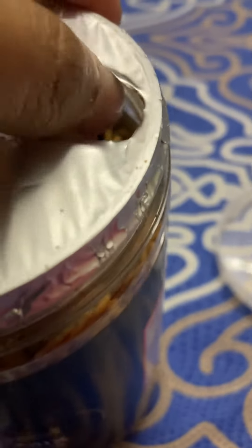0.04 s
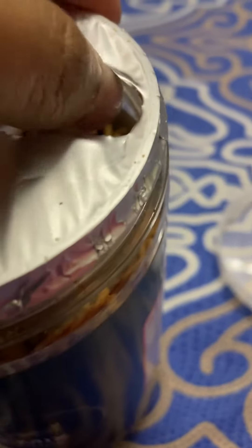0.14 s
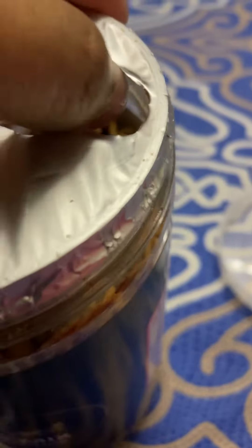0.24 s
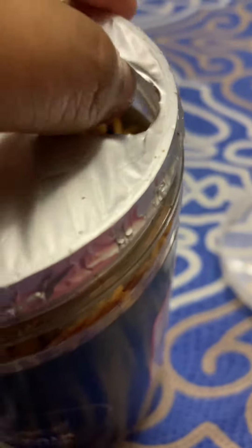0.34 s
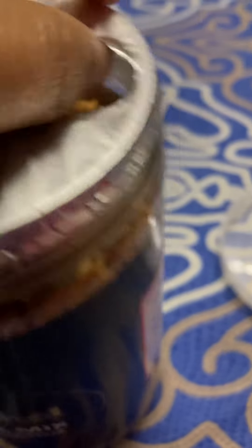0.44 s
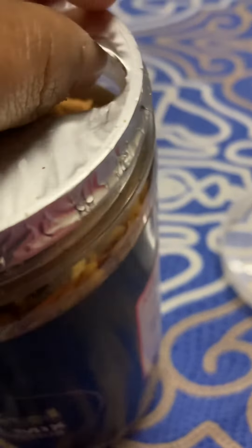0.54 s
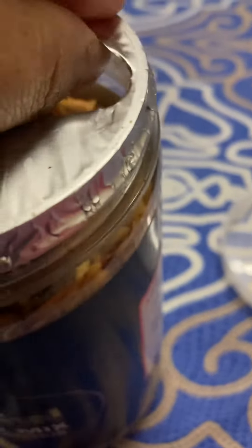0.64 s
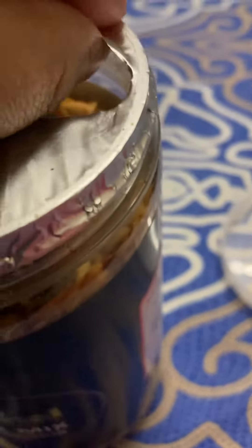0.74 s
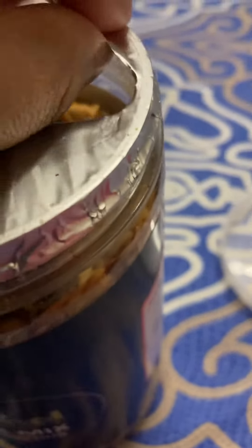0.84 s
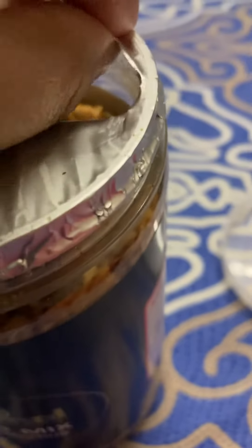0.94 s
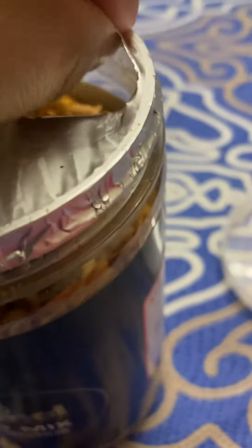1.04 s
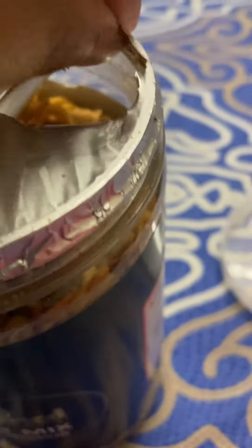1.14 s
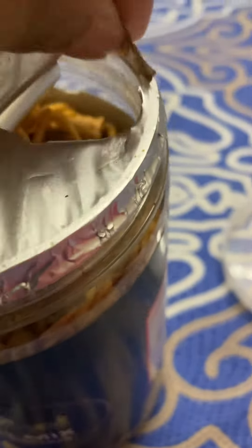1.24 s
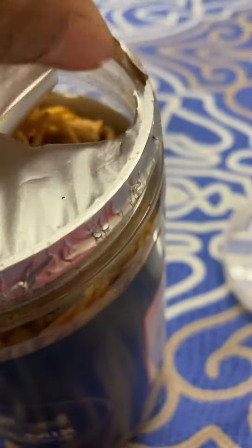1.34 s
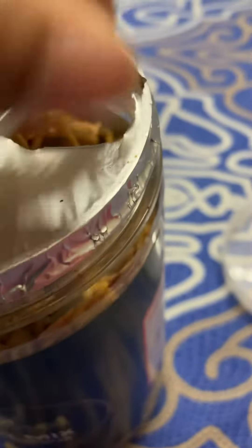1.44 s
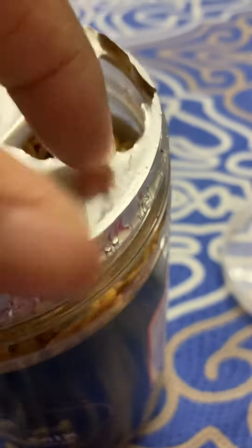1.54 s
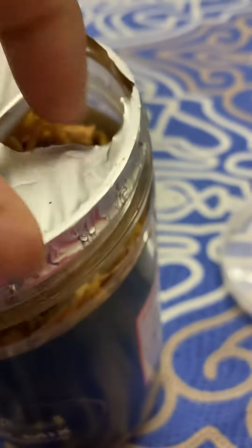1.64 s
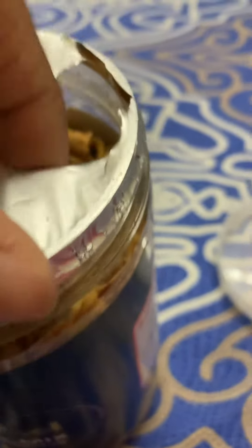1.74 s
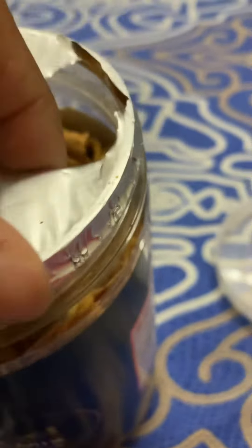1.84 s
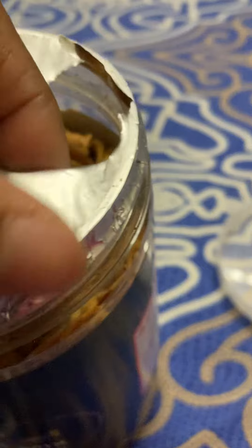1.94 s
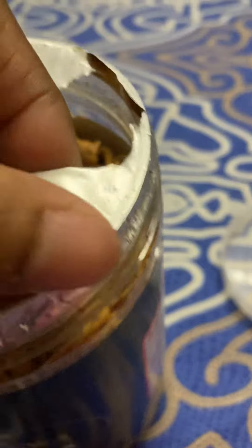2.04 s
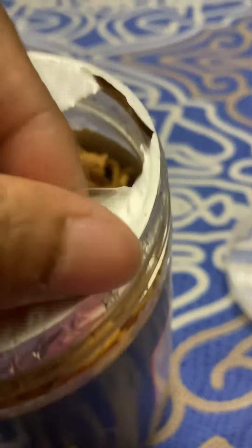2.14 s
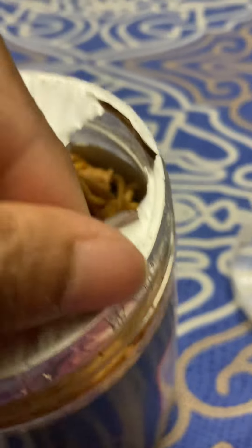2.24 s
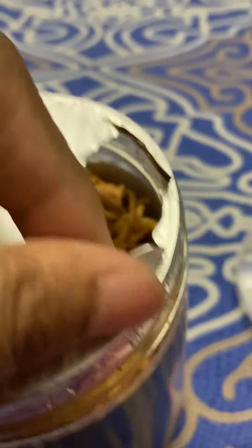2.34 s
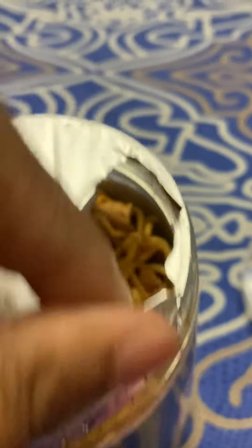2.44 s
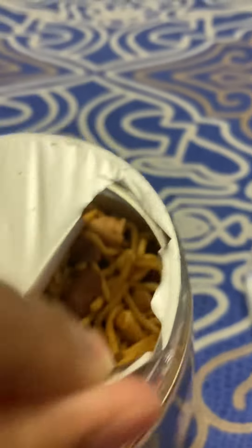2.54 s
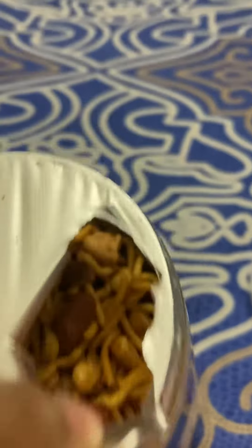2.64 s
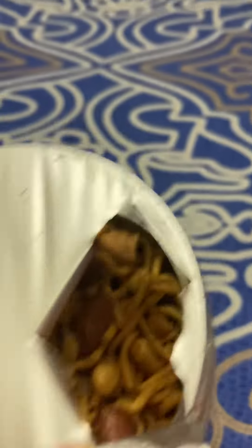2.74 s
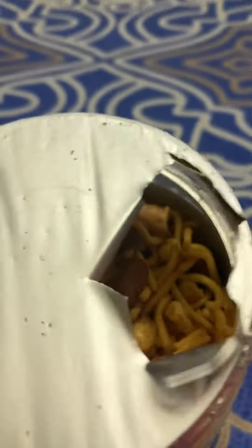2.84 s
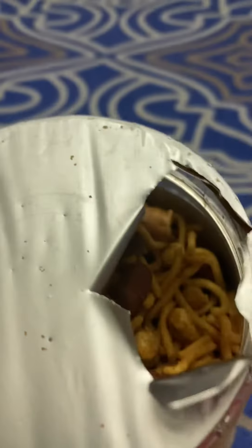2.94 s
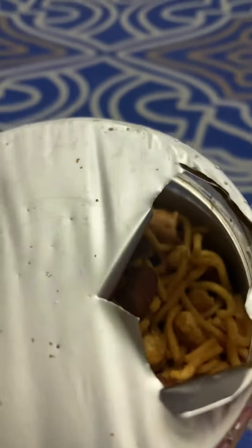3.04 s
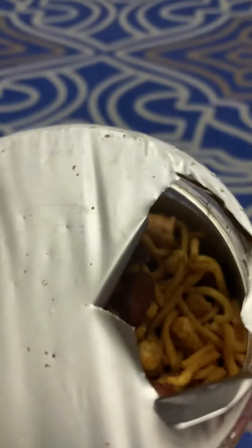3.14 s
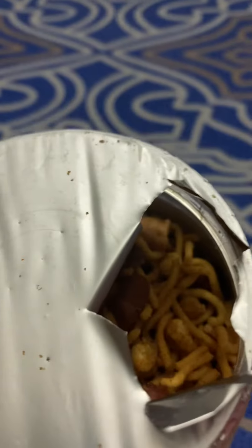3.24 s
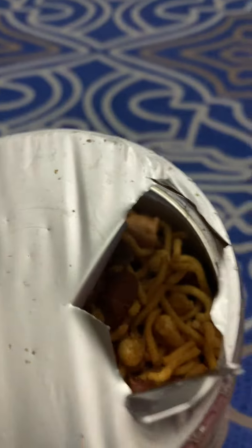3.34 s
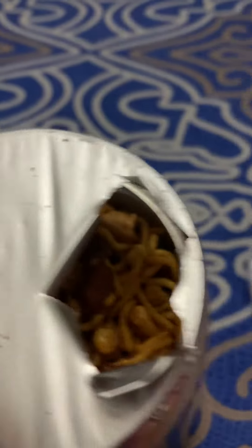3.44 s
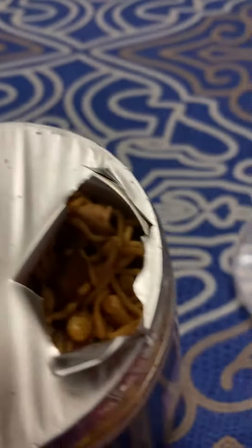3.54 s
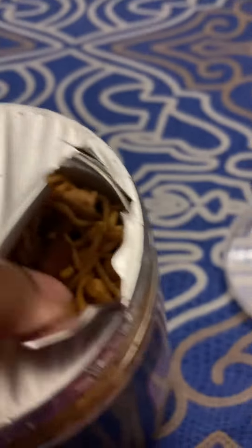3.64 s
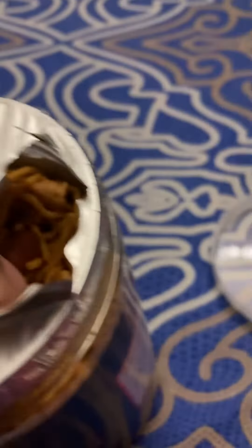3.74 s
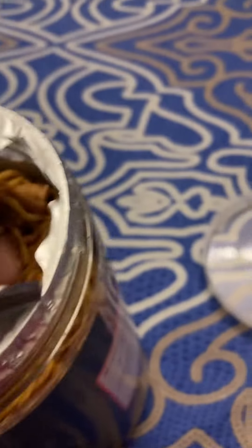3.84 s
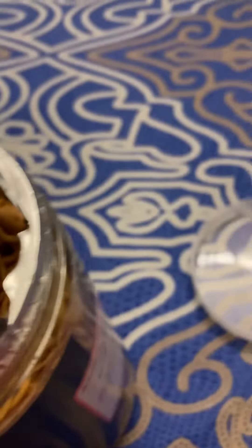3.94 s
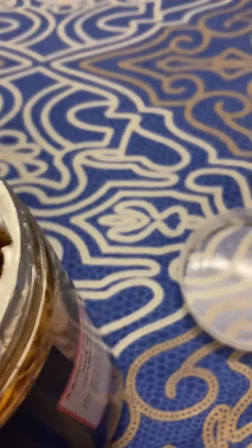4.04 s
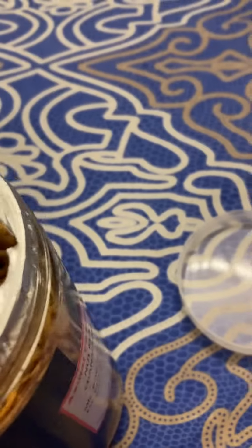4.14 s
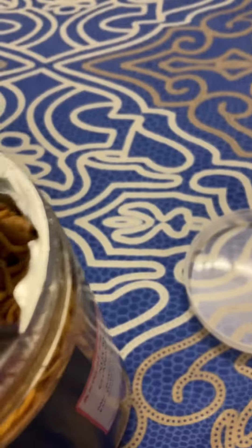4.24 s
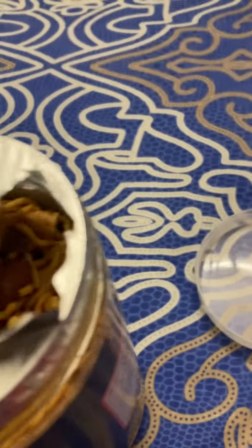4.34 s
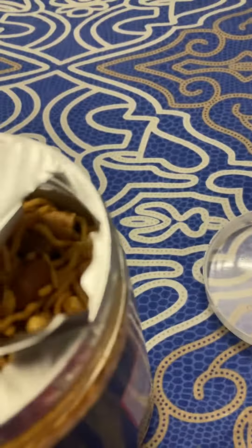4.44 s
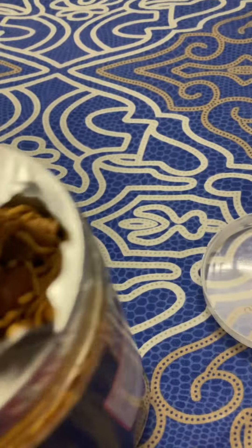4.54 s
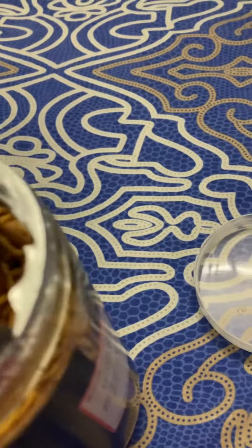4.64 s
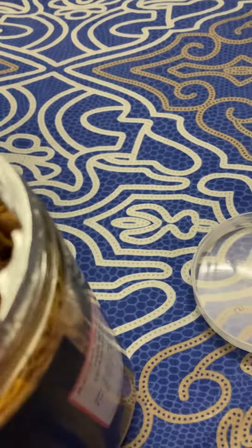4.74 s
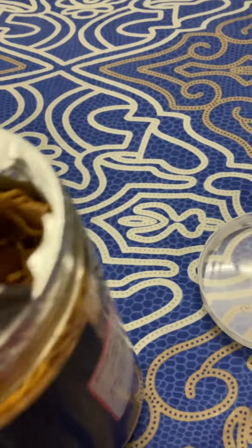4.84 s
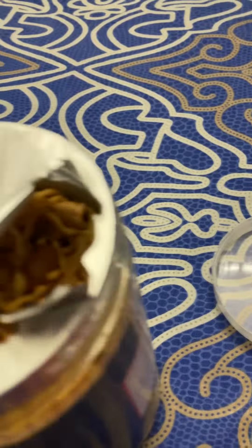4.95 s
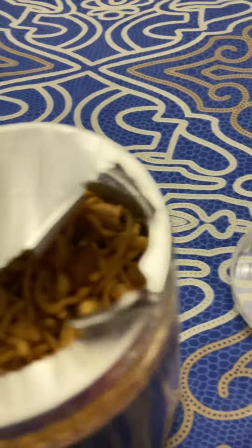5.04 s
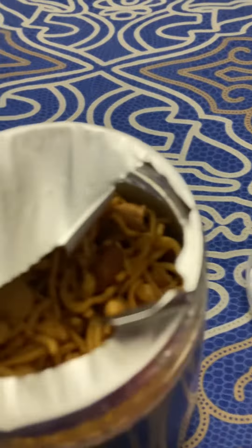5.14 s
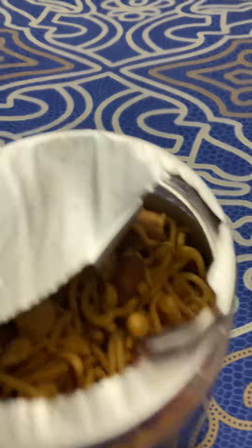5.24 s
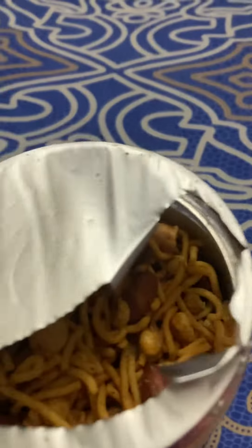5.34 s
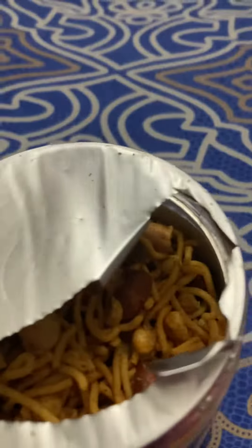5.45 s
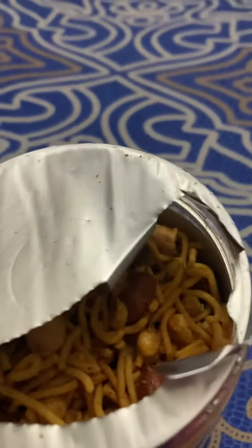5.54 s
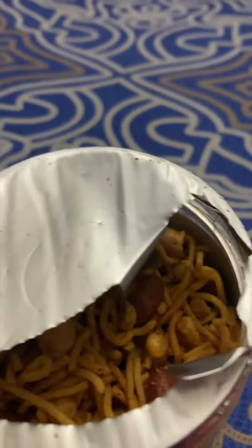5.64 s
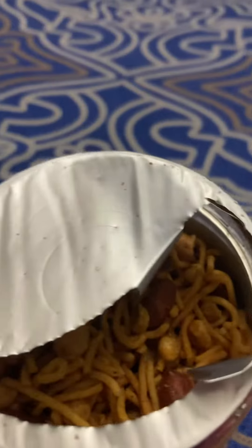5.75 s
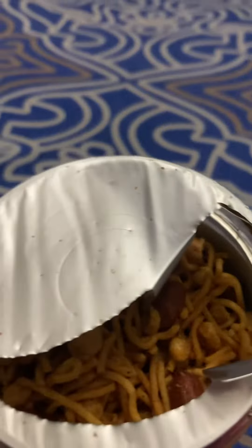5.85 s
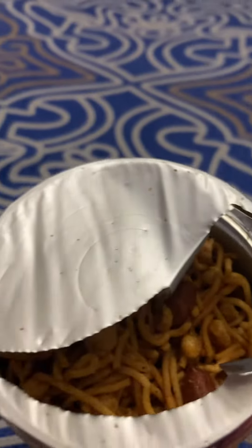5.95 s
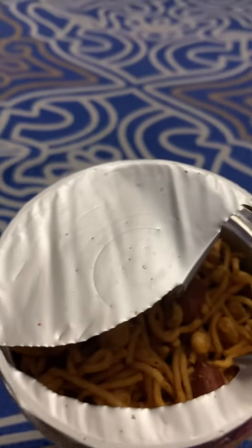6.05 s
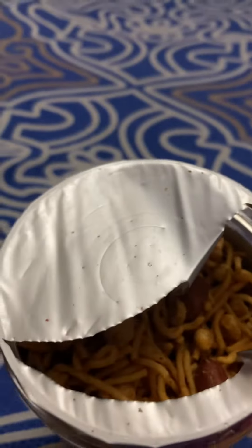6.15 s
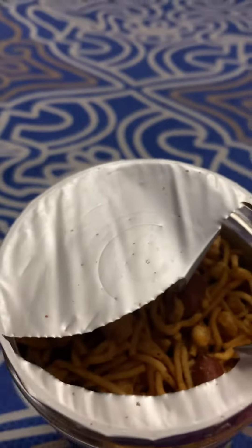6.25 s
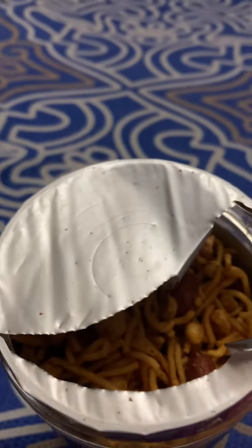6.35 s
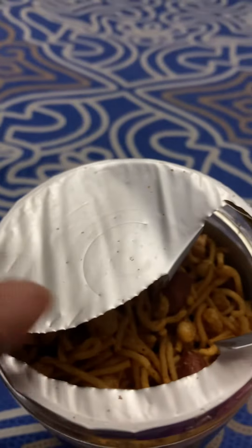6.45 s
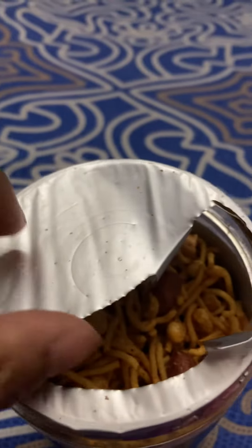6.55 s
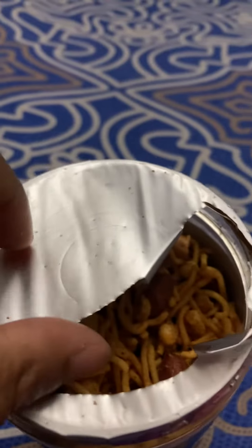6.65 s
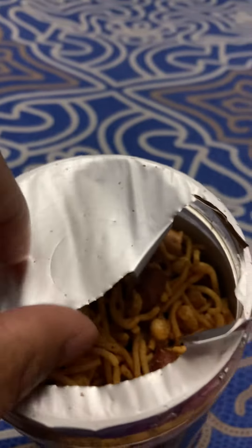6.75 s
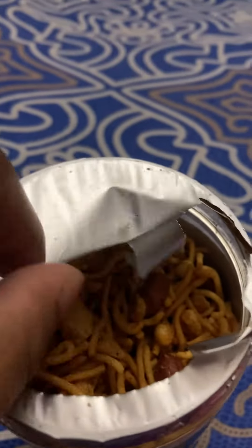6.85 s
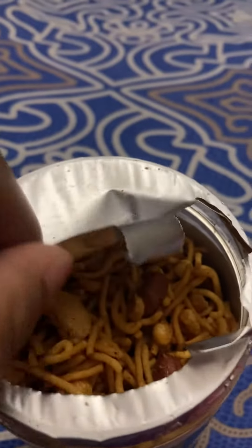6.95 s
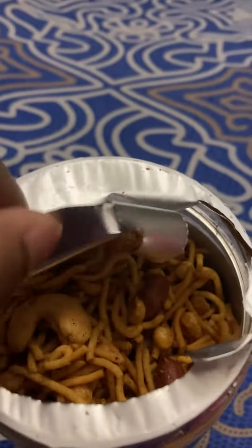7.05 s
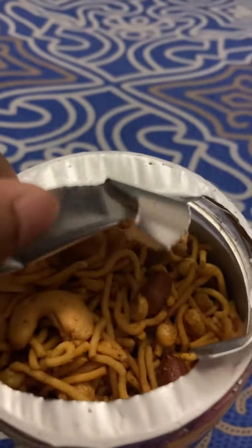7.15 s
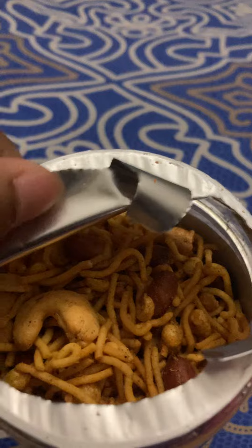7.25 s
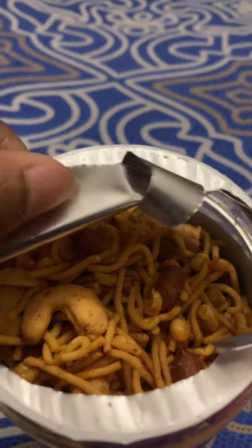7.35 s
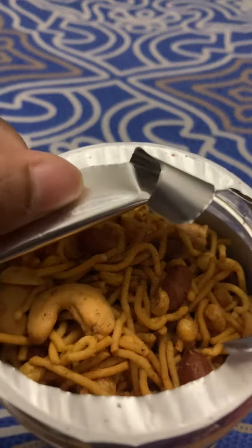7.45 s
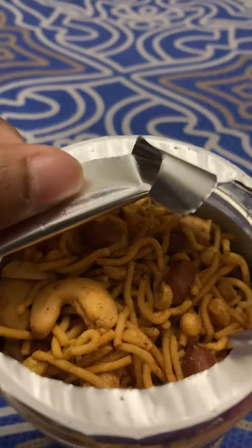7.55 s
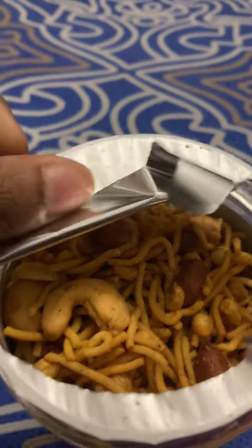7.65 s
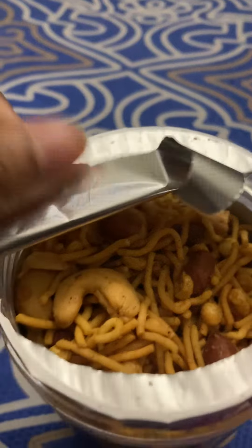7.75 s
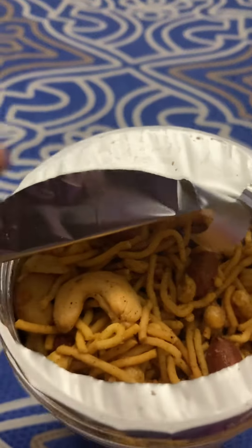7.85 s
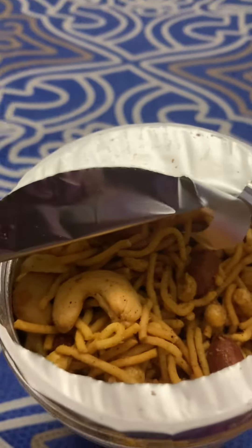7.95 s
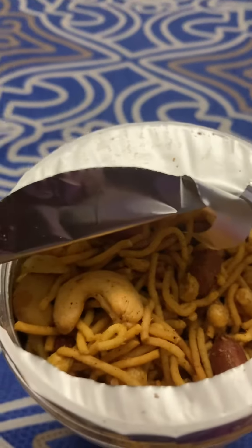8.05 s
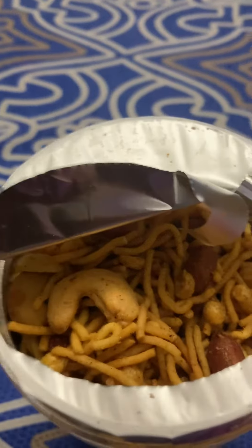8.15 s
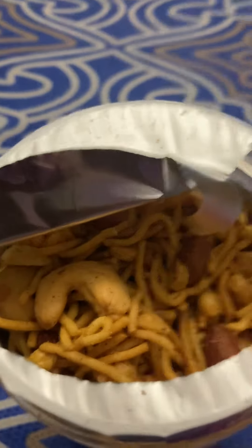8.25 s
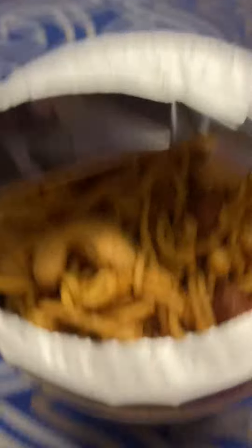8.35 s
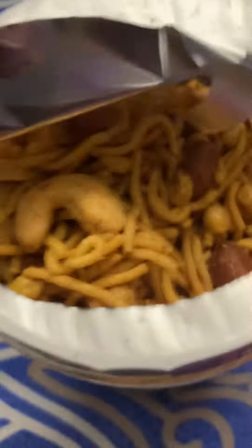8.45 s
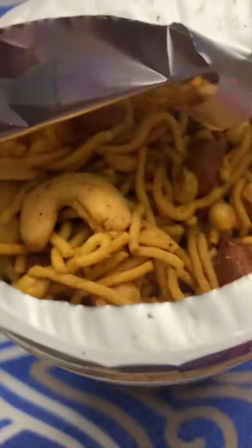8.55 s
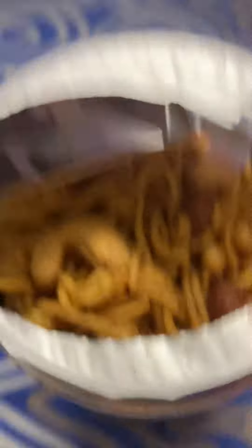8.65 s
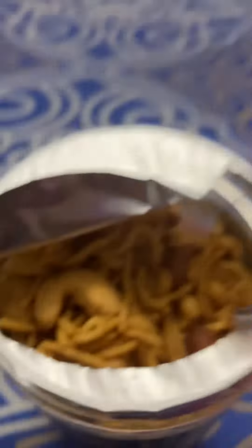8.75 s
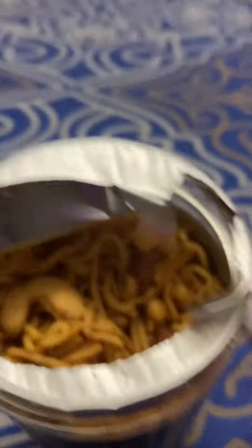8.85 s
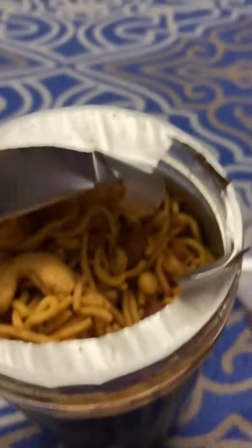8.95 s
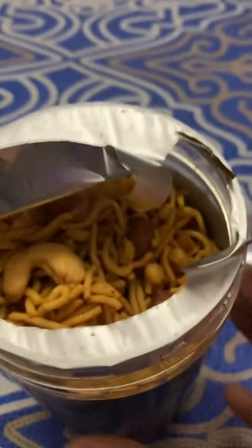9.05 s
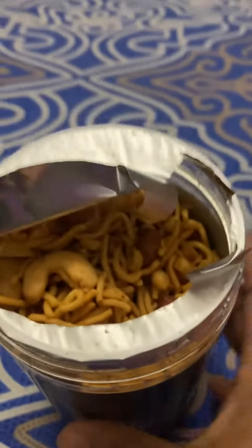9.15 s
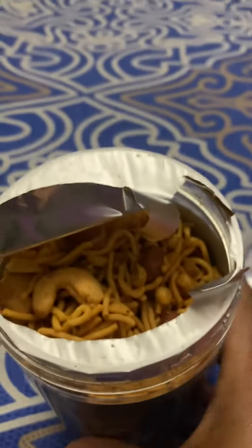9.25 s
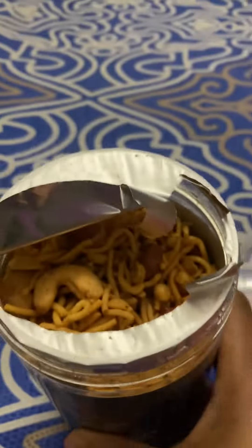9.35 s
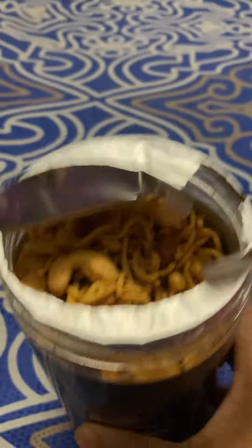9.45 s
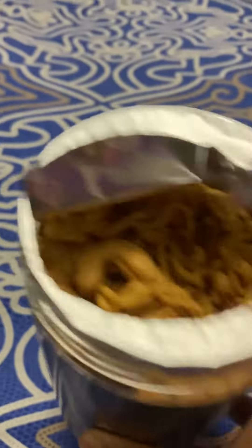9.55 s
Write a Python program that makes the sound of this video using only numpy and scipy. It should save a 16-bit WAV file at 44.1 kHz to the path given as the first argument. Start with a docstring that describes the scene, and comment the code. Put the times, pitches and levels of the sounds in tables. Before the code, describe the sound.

Stiff foil buckles and rips on a jar in irregular bursts: bright dry cracks, papery rustling and small hollow pops. A pause near three seconds leads to a harder rip, lighter creasing, then a tight cluster of snaps. After near quiet with faint scuffs of the grip, a final crack sounds. Close stereo pickup in a small, fairly dry room with a soft pulsing motor hum.

```python
"""Tearing a foil seal

A hand tears the foil seal off a plastic snack jar, close to a phone held indoors.
Each buckle of the foil is a noise burst that snaps and excites resonances of the rim and the jar's air.
Between snaps, random creasing rustles under each pull, with low thumps and soft swishes of the hand.
Two microphones hear it with sparse room reflections and scuffs of the grip on the phone.
A fan motor hums and throbs as two close tones beat, over the faint noise of the room's air."""
import sys
import numpy as np
from scipy import signal
from scipy.io import wavfile
from scipy.ndimage import uniform_filter1d

SR = 44100
rng = np.random.default_rng(int(sys.argv[2]) if len(sys.argv) > 2 else 0)


def generate_wav(signal):
    """Clip the signal to [-1, 1] and save it as 16-bit WAV at the path in sys.argv[1]."""
    frames = np.transpose(np.atleast_2d(signal))
    scaled = np.clip(frames, -1, 1) * 32767
    pcm = np.round(scaled).astype(np.int16)
    wavfile.write(sys.argv[1], SR, pcm)


N = 423801  # samples

# Snaps of the foil, levels relative: start_s, crack_db, jar_ring_db, crack_t60_s
SNAPS = [(0.1268, -30, -34.5, 0.073), (0.383, -19.5, -54, 0.03), (0.417, -41, -32, 0.02),
         (0.554, -70, -31, 0.02), (0.324, -42.5, -45.5, 0.47), (0.585, -64, -34, 0.035),
         (0.6138, -9.5, -29, 0.027), (0.627, -18, -23.5, 0.14), (0.652, -13, -39, 0.024),
         (0.9555, -18.5, -29.5, 0.007), (1.061, -28, -30, 0.026), (1.0957, -4.5, -19, 0.052),
         (1.1599, -26.5, -26.5, 0.12), (1.4507, -9, -16.5, 0.1), (1.5673, -5.5, -15.5, 0.08),
         (1.747, -22.5, -20, 0.027), (1.8833, -39.5, -25.5, 0.096), (1.93, -15, -22, 0.024),
         (2.053, -79, -21, 0.074), (2.092, -26.5, -22.5, 0.046), (2.1032, -6.5, -22.5, 0.052),
         (2.261, -33.5, -50, 0.087), (2.2875, -16.5, -29, 0.1), (2.3437, -11, -48, 0.0048),
         (2.408, -14.5, -25.5, 0.13), (2.6678, -20, -61, 0.0056), (2.7302, -9, -22, 0.068),
         (3.561, -38.5, -45, 0.19), (3.641, -35.5, -29.5, 0.04), (3.858, -12.5, -31.5, 0.031),
         (3.9478, -9.5, -19, 0.0023), (3.9813, -6, -17, 0.076), (4.0079, -13, -24, 0.11),
         (4.382, -11.5, -22.5, 0.074), (4.4382, -23.5, -30, 0.063), (4.691, -30.5, -34.5, 0.039),
         (4.774, -59, -34, 0.12), (4.839, -30.5, -35, 0.15), (4.9155, -15, -21, 0.053),
         (5.1646, -16, -33.5, 0.06), (5.2971, -25, -33, 0.085), (5.456, -33.5, -64, 0.03),
         (5.509, -30.5, -53, 0.035), (5.754, -23, -54, 0.15), (5.939, -32, -61, 0.13),
         (6.014, -34, -65, 0.025), (6.159, -6.5, -61, 0.0043), (6.2122, -14.5, -53.5, 0.0073),
         (6.4316, -27, -75, 0.031), (6.575, -30.5, -34, 0.21), (6.592, -26, -26, 0.12),
         (6.711, -35, -28, 0.095), (6.7238, -14, -25, 0.12), (6.7649, -8, -17.5, 0.049),
         (6.785, -3.5, -40.5, 0.017), (6.849, -13, -21, 0.027), (6.888, -29.5, -36, 0.0097),
         (6.9452, -12, -31, 0.046), (6.9831, -6.5, -38, 0.013), (7.116, -4.5, -30, 0.024),
         (7.404, -37.5, -42.5, 0.015), (7.546, -16, -23, 0.098), (7.5875, -8.5, -39, 0.012),
         (7.6889, -13.5, -29.5, 0.029), (7.7386, -22, -36, 0.07), (8.68, -52, -59.5, 0.015),
         (9.393, -3.5, -22, 0.042), (9.5662, -21, -44, 0.74)]
# Spectrum of the bare foil: frequency_hz, level_db
FOIL = [(3500, -42.5), (5500, 5), (9200, 6), (11500, -3), (14000, 1.5), (15800, -9)]
# Resonances of the taut foil on the rim: pitch_hz, width_hz, level_db
RIM = [(2008, 170, 0), (3055, 720, -2.5), (4180, 260, -14)]
# Resonances of the air at the opening: pitch_hz, width_hz, level_db
MOUTH = [(1004, 62, 11), (1164.5, 210, 15)]
# Seal's drum note, air inside, plastic wall, seal's overtone: pitch_hz, width_hz, level_db
HOLLOW = [(176, 29, 2.5), (262, 42, -3), (331, 49, 6), (700, 110, -15)]
TORN_S = 3.9  # the tear runs on and the seal stops drumming
# The rim lies between crack and jar ring; the hollow follows the jar ring
RIM_FROM_CRACK, SNAP_RIM_DB, SNAP_HOLLOW_DB = 0.41, 3.5, -12
# Per doubling of a snap's length: big folds thump more and ring the rim less
LONG_HOLLOW_DB, LONG_RIM_DB, USUAL_T60_S = 3, -0.5, 0.037
# Separate pulls of the fingers, levels nominal: start_s, rise_s, fade_s, fizz_db, jar_ring_db
PULLS = [(-0.05, 0.027, 1.0, -66.5, -55.5), (0.297, 0.18, 0.52, -49.5, -47.5),
         (0.847, 0.31, 0.15, -47, -39.5), (1.44, 0.26, 0.16, -49.5, -49.5), (1.88, 0.24, 0.18, -52.5, -66),
         (2.23, 0.47, 0.21, -52.5, -53), (2.95, 0.32, 0.38, -90, -67), (3.5, 0.16, 0.75, -56, -52.5),
         (3.85, 0.16, 0.029, -35, -64), (4.154, 0.15, 0.62, -35.5, -30), (4.602, 0.21, 0.67, -46, -42),
         (5.251, 0.13, 0.49, -53.5, -70), (5.661, 0.38, 0.5, -53, -65.5), (6.362, 0.076, 0.16, -73.5, -59),
         (6.53, 0.37, 0.63, -50, -50.5), (7.419, 0.28, 0.17, -60.5, -54), (9.04, 0.021, 0.52, -69.5, -88),
         (9.299, 0.1, 0.18, -55, -50.5), (9.501, 0.12, 0.16, -43, -46.5)]
SWELL_DB, ROUND = -31, 1.016  # level one rise or fade away from the peak; exponent rounding its top
IDLE_FIZZ_DB, IDLE_JAR_DB = -87, -84.5  # the hand merely holding the jar
HOLLOW_FOLLOWS, HOLLOW_DB = 0.96, -3.5  # the hollow rumble swells less than the mouth ring
BEND_DB = 5.5  # how far the colour of the rustle wanders as the flap bends
BEND_STEP = 0.05  # pitch ratio step between neighbouring bends of the flap
# Low thumps as the whole seal or the jar flexes in the hand: start_s, peak_db, pitch_hz, t60_s
THUMPS = [(0.114, -32.5, 325, .06), (1.452, -29.5, 183.2, .08), (2.103, -22.5, 264, 0.055),
          (9.391, -22, 905, 0.14)]
# Swishes and rubs as the hand moves over jar and phone: middle_s, length_s, mean_pitch_hz, level_db
SWISHES = [(3.594, .35, 180.3, -48.5), (7.931, 0.24, 2010, -72), (8.831, .3, 1282, -78),
           (9.2, 0.15, 1610, -76)]
# The hand shifts on the phone, pushing the two microphones opposite ways: start_s, peak_db, pitch_hz, t60_s
GRIP = [(8.185, -36, 622, 0.23), (8.515, -43.5, 645, 0.034), (8.674, -43.5, 836, 0.057)]
# Decay of the room: frequency_hz, t60_s
ROOM = [(250, 0.35), (1500, 0.18), (12000, 0.022)]
# Phase by which the left microphone leads: frequency_hz, lead_rad
LEAD = [(0, 4.5), (350, -0.97), (690, -2), (1030, -0.95), (1550, -2.5), (2070, -2), (3100, -3), (4130, -5),
        (6030, -2.5), (12060, 2.5), (16700, 8.5)]
# Typical drift of that lead as phone and jar move: frequency_hz, drift_rad
SWAY = [(150, 0.068), (1500, .7), (10000, 0.016)]
# Level of the left microphone minus the right: frequency_hz, difference_db
LEAN = [(400, -0.5), (1650, -2.5), (8000, 0)]
HUM_HZ, BEAT_UNIT_HZ = 100.79, 4.6
# Tones of the fan: offset above the hum (in units of BEAT_UNIT_HZ), level_db (rms)
THROB = [(0, -48.5), (1.004, -59.5)]
WEAKEST_S = 8.135  # a moment when the throb is at its lowest
# Spectrum shape of the room air common to both microphones: frequency_hz, density_db
AIR = [(25, -16), (60, 1.5), (115, 4), (190, -5), (300, -13), (500, -26.5), (2000, -35.5), (16000, -56)]
# Spectrum shape of the room air opposed between them: frequency_hz, density_db
AIR_SIDE = [(25, -8), (100, -6), (400, -21), (2500, -34.5), (16000, -56)]
AIR_DB, AIR_SIDE_DB = -60.5, -64.5  # rms
EDGE_HZ = 16800


def snaps():
    """Impulsive excitation: strain creaks, creases burst and die, and a slower push rings the cavity."""
    out = np.zeros(N)
    t = np.arange(8000) / SR - .02
    after = np.maximum(t, 0)
    foil = causal(FOIL)
    for s, crack_db, mouth_db, t60 in SNAPS:
        doublings = np.log2(t60 / USUAL_T60_S)
        rim_db = RIM_FROM_CRACK * crack_db + (1 - RIM_FROM_CRACK) * mouth_db
        rim_db += SNAP_RIM_DB + LONG_RIM_DB * doublings
        hollow_db = mouth_db + SNAP_HOLLOW_DB + LONG_HOLLOW_DB * doublings
        shape, facet = rng.uniform(-1, 1, 2)  # how the flap is bent this time

        # strain builds before the fold gives
        creak = amp(-20.0) * np.exp(np.minimum(t, 0) / (0.067 * t60)) * (t < .002)
        burst = crackle(count=len(t), per_s=3000, spread_db=2.0, smooth=0.84)
        crack_decay = amp(-60 * after / t60) * (1 - np.exp(-after / (0.0089 * t60)))
        crack = burst * (creak + crack_decay)
        crack += 3.1 * np.exp(-((t - .0004) / .00003) ** 2)  # the first crease is the sharpest

        # small facets are brighter and settle first
        quick = crack * (.4 + amp(-60 * after / 0.036))
        bright = signal.lfilter([1, .5 * facet, 0.52 * shape], [1], quick)
        push_decay = amp(-60 * after / (0.0079 + 0.9 * t60)) * (1 - np.exp(-after / 0.0021))
        push = burst[::-1] * (creak + push_decay)

        hollow = HOLLOW if s < TORN_S else HOLLOW[1:-1]
        parts = ((bright, foil, crack_db),
                 (crack, ringing(RIM, 1 + 0.1 * facet), rim_db),
                 (push, ringing(MOUTH, 1 + 0.092 * shape), mouth_db),
                 (push, ringing(hollow, 1 + 0.21 * facet), hollow_db))
        for drive, body, db in parts:
            sound = signal.fftconvolve(drive, body)[:len(t)]
            add(out, s + t[0], peaked(sound, db + 2.0))
    return out


def rustle():
    """Random excitation: uneven creasing drives foil, rim, mouth and hollow, each from its own patch."""
    t, out = np.arange(N) / SR, 0
    fizz_db, mouth_db = (np.repeat(level, 32)[:N] for level in pulls(t[::32]))
    hollow_db = HOLLOW_FOLLOWS * mouth_db + HOLLOW_DB
    rim_db = 0.39 * fizz_db + 0.6 * mouth_db  # the rim follows the mouth more than the fizz
    drum_db = np.where(t < TORN_S, hollow_db - 5.0, -120)

    # a hard pull rips evenly, a light touch in fits; the idle hand only brushes
    light = np.clip((-32 - mouth_db) / 28, .25, 1)
    light = light * np.clip((fizz_db - IDLE_FIZZ_DB) / 12, .2, 1)

    # small folds shake every part at once, the bare foil most; each starts sharply and dies in some ms
    kinks = amp(4.0 * np.minimum(rng.exponential(1, N), 3)) * (rng.random(N) < 60 / SR)
    shared = .7 + signal.lfilter([1], [1, -np.exp(-1 / (.007 * SR))], kinks) * light

    levels = fizz_db, rim_db, mouth_db, hollow_db, drum_db
    bodies = None, RIM, MOUTH, HOLLOW[1:-1], HOLLOW[:1]  # None is the bare foil
    for db, body in zip(levels, bodies):
        own = evened(uniform_filter1d(rng.standard_normal(N), 900))
        creases = crackle(count=N, per_s=580, spread_db=3.5, smooth=1)
        shake = np.sqrt(shared) if body else shared
        drive = creases * shake * amp(2.5 * light * own)
        sound = flexing(drive, body) if body else signal.oaconvolve(drive, causal(FOIL))[:N]
        out = out + amp(db) * evened(sound)
    return out


def pulls(t):
    """Addition of powers: every pull swells to its peak and fades, over the idle hand; in decibels."""
    power = np.ones_like(t) * amp([[2 * IDLE_FIZZ_DB], [2 * IDLE_JAR_DB]])  # doubled dB give power
    for start, rise, fade, fizz_db, jar_db in PULLS:
        peak_s = start + rise
        off = np.maximum((peak_s - t) / rise, (t - peak_s) / fade)
        swell = amp(2 * SWELL_DB * np.minimum(off, 10) ** ROUND)
        power = power + amp([[2 * fizz_db], [2 * jar_db]]) * swell
    return 10 * np.log10(power)


def flexing(drive, modes):
    """Variable resonance: crossfaded resonators slide the pitch up and down as the flap bends."""
    slow = uniform_filter1d(uniform_filter1d(rng.standard_normal(N), size=3000), size=3000)
    bend = np.clip(evened(slow), -2, 2)
    out = 0
    for k in range(-2, 3):
        share = np.sqrt(np.clip(1 - abs(bend - k), 0, 1))
        out = out + signal.oaconvolve(drive * share, ringing(modes, 1 + BEND_STEP * k))[:N]
    return out


def wandering(x):
    """Time-varying filtering: narrow peaks and dips drift, each lasting about a tenth of a second."""
    z = signal.stft(x, nperseg=512, noverlap=384)[2]
    patches = patchy(rng.standard_normal(z.shape[::-1]).T, bins=3, frames=30)
    gain = amp(BEND_DB * patches - BEND_DB ** 2 / 14.0)  # the offset makes up for the louder peaks
    return signal.istft(z * gain, nperseg=512, noverlap=384)[1][:N]


def thumps():
    """Damped resonance: each short dull push rings one low mode."""
    out, t = np.zeros(N), np.arange(9000) / SR
    for s, db, hz, t60 in THUMPS:
        push = rng.standard_normal(len(t)) + 30 * np.exp(-t / 0.00029)
        push = push * amp(-60 * t / t60) * (1 - np.exp(-t / .001))
        sound = signal.fftconvolve(push, ringing([(hz, 0.1 * hz, 0)]))[:len(t)]
        add(out, s, peaked(sound, db))
    return out


def swishes():
    """Narrow-band friction noise: slow noise shifted to a pitch that sags as the stroke swells and fades."""
    out = np.zeros(N)
    for s, length, hz, db in SWISHES:
        u = np.arange(0, 1, 1 / (length * SR))  # progress of the stroke
        noise = rng.standard_normal((SR, 2))[:len(u)] @ [1, 1j]
        slow = signal.lfilter([1], [1, -np.exp(-np.pi * 0.12 * hz / SR)], noise)
        turns = np.cumsum(hz * (1 + 0.22 * (.5 - u))) / SR
        hiss = (slow * np.exp(2j * np.pi * turns)).real
        add(out, s - length / 2, amp(db) * np.sin(np.pi * u) * evened(hiss))
    return out


def grip():
    """Structure-borne sound: decaying noise rings one broad mode, as dull scuffs through the phone's case."""
    out, t = np.zeros(N), np.arange(9000) / SR
    for s, db, hz, t60 in GRIP:
        scuff = rng.standard_normal(len(t)) * amp(-60 * t / t60) * (1 - np.exp(-t / 0.0027))
        sound = signal.fftconvolve(scuff, ringing([(hz, 0.21 * hz, 0)]))[:len(t)]
        sound = peaked(sound, 0) + 0.24 * scuff * amp(-60 * t / 0.089)  # with a thin tick
        add(out, s, peaked(sound, db))
    return out


def room(x):
    """Reverberation: sparse reflections of random sign, each band dying at its own speed."""
    taps = np.zeros((2, SR // 2))
    at = np.arange(200, SR // 2 - 20, 20)
    at = at + rng.integers(0, 20, (2, len(at)))
    np.put_along_axis(taps, at, rng.choice([-1., 1.], at.shape), 1)
    hz, t, z = signal.stft(taps, SR, nperseg=256)
    decay = amp(-60 * t / read(ROOM, hz)[:, None])
    tail = signal.istft(z * decay, SR, nperseg=256)[1]
    common = tail[0] + 0.4 * tail[1] * np.array([[1], [-1]])  # mostly the same at both microphones
    return signal.fftconvolve(x[None], common / np.linalg.norm(common[0]), axes=1)[:, :N]


def microphones(x):
    """Interaural-style differences: two ports hear a near source with unlike level and drifting phase."""
    hz, t, z = signal.stft(x, SR, nperseg=512, noverlap=384)
    drift = patchy(rng.standard_normal(z.shape[:0:-1]).T, bins=12, frames=80)
    lead = read(LEAD, hz)[:, None] + read(SWAY, hz)[:, None] * drift
    half = np.exp(.5j * lead) * amp(read(LEAN, hz)[:, None] / 2)  # each port takes half the difference
    return signal.istft(z * np.array([half, 1 / half]), nperseg=512, noverlap=384)[1][:, :N]


def fan():
    """Beating: a motor hum and a weaker tone one turn above it interfere, so the hum throbs once a turn."""
    t = np.arange(N) / SR - WEAKEST_S
    tones = [amp(db) * np.sin(2 * np.pi * (HUM_HZ + k * BEAT_UNIT_HZ) * t) for k, db in THROB]
    throb = np.sqrt(2) * (tones[0] - sum(tones[1:]))
    return throb * amp([[.4], [-.4]])  # slightly louder on the left


def air(points, db):
    """Broadband noise: random phases under a given spectrum, with drifting patches of level."""
    hz = np.fft.rfftfreq(2048, 1 / SR)
    a, b, patches = rng.standard_normal((N // 512 + 5, 1025, 3)).T
    patches = patchy(patches, bins=10, frames=10)
    z = (a + 1j * b) * amp(read(points, hz)[:, None] + 4.0 * patches)
    return amp(db) * evened(signal.istft(z, nperseg=2048, noverlap=1536)[1][:N])


def crackle(count, per_s, spread_db, smooth):
    """Shot noise: tiny clicks of very unequal size over a share of smooth hiss."""
    size = amp(spread_db * np.minimum(rng.exponential(1, count), 5))
    clicks = size * (rng.random(count) < per_s / SR) * rng.standard_normal(count)
    return evened(clicks) + smooth * rng.standard_normal(count)


def ringing(modes, stretch=1, size=3000):
    """Modal superposition: damped resonances with no steady part; stretch shifts every pitch."""
    t = np.arange(size) / SR
    ring = 0
    for hz, width, db in modes:
        decay = np.exp(-np.pi * width * t)
        ring = ring + amp(db) * width * decay * np.cos(2 * np.pi * hz * stretch * t)
    edges_hz = [0.62 * modes[0][0], 1.61 * modes[-1][0]]
    return signal.sosfilt(signal.butter(2, edges_hz, "band", fs=SR, output="sos"), ring)


def causal(points, size=1024):
    """Minimum phase: the most prompt impulse response with the given spectrum."""
    log_gain = np.log(amp(read(points, abs(np.fft.fftfreq(4 * size, 1 / SR)))))
    phase = -signal.hilbert(log_gain).imag
    return np.fft.ifft(np.exp(log_gain + 1j * phase)).real[:size]


def patchy(noise, bins, frames):
    """Local averaging: smooths noise over frequency bins and time frames, to unit rms."""
    return evened(uniform_filter1d(uniform_filter1d(noise, bins, axis=0), frames, axis=1))


def read(points, hz):
    """Interpolation: reads a spectrum on a log-frequency axis."""
    f, value = np.transpose(points)
    return np.interp(np.log(hz + 1), np.log(f + 1), value)


def amp(db):
    """Decibel law: level to amplitude gain."""
    return 10 ** (np.asarray(db) / 20)


def evened(x):
    """Normalization: scales to unit rms."""
    return x / np.sqrt(np.mean(x ** 2) + 1e-20)


def peaked(x, db):
    """Normalization: scales the largest peak to a level."""
    return amp(db) * x / abs(x).max()


def add(mix, s, sound):
    """Superposition: mixes a sound in at a time."""
    part = mix[round(s * SR):][:len(sound)]
    part += sound[:len(part)]


def scene():
    """Superposition: foil and its reflections at the microphones, over hum, air and grip."""
    foil = snaps() + wandering(rustle()) + thumps() + swishes()
    opposed = air(AIR_SIDE, AIR_SIDE_DB) * np.array([[1], [-1]]) + grip() * np.array([[1], [-.65]])
    near = microphones(foil + amp(-18.5) * room(foil))
    return near + fan() + air(AIR, AIR_DB) + opposed


def record(dry):
    """Band limitation: a linear-phase low-pass removes the highest treble."""
    low_pass = signal.firwin(511, EDGE_HZ, window=("kaiser", 9), fs=SR)
    return signal.oaconvolve(dry, low_pass[None], "same")


dry = scene()
out = record(dry)
generate_wav(out)
```